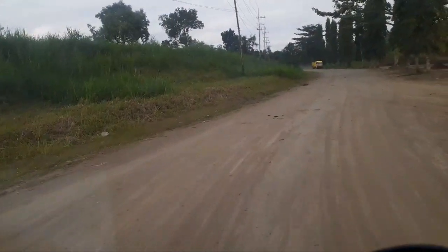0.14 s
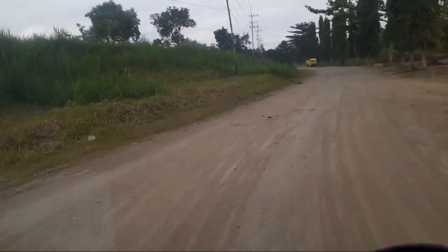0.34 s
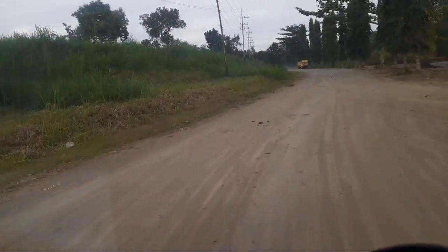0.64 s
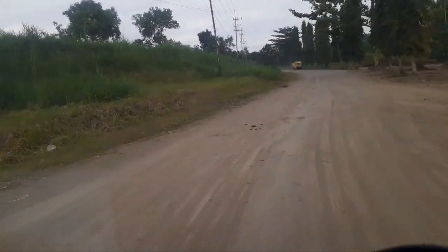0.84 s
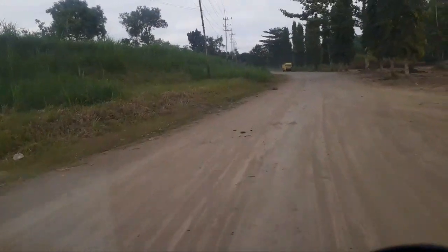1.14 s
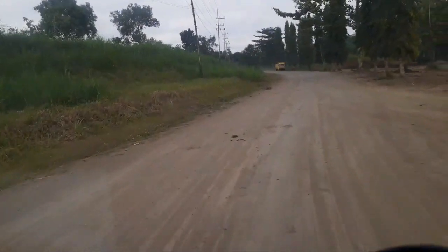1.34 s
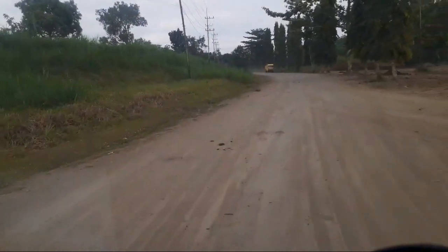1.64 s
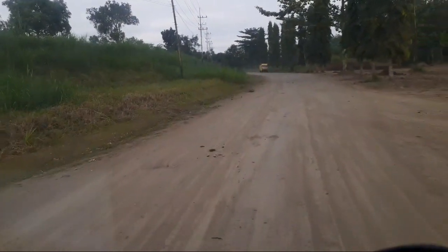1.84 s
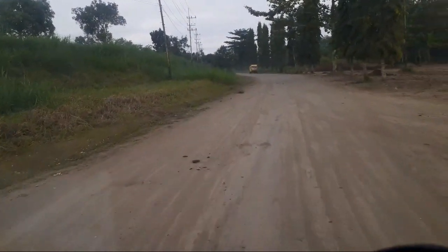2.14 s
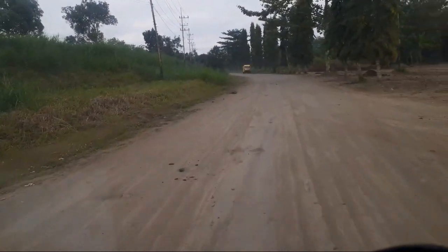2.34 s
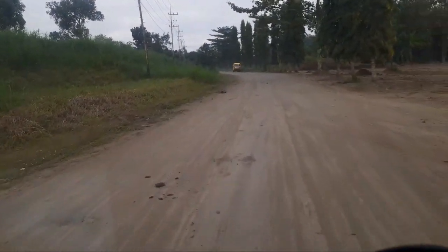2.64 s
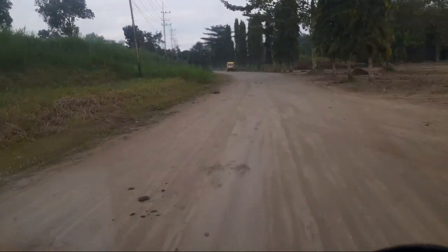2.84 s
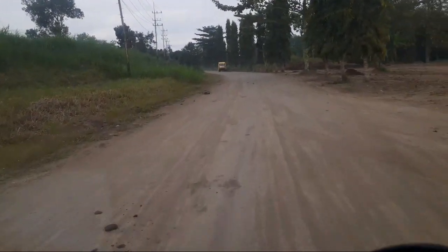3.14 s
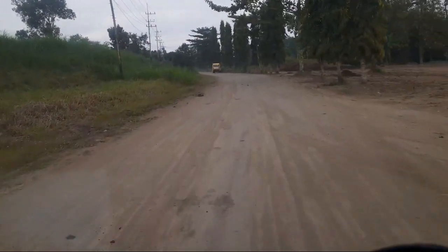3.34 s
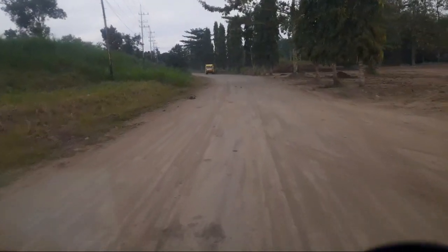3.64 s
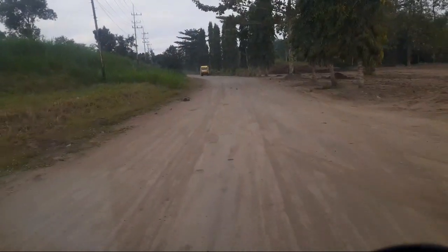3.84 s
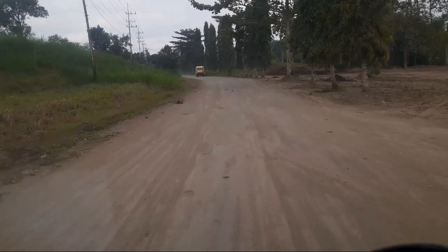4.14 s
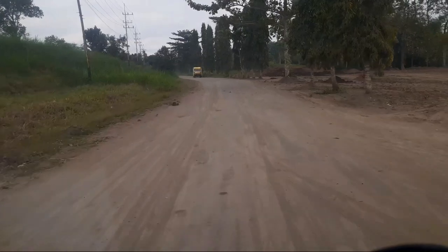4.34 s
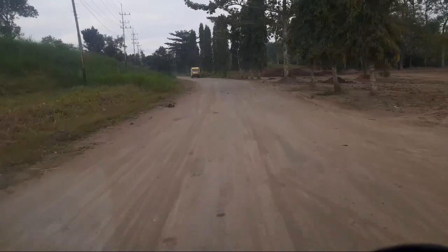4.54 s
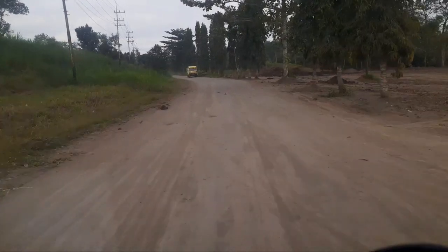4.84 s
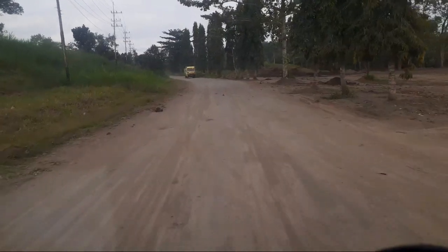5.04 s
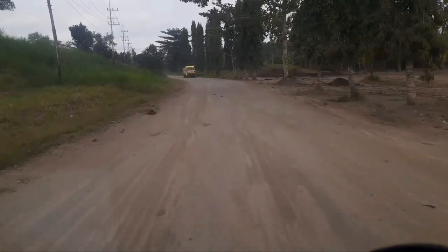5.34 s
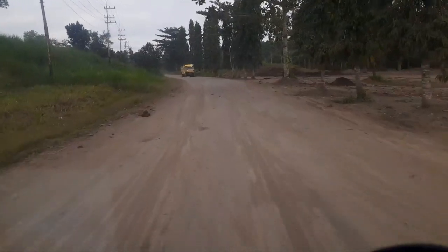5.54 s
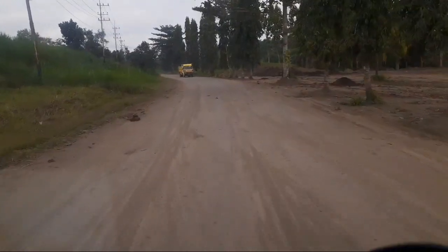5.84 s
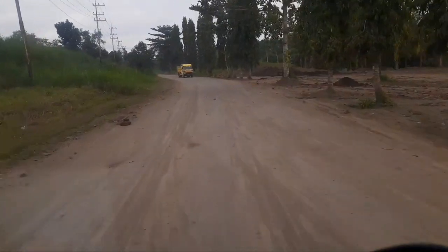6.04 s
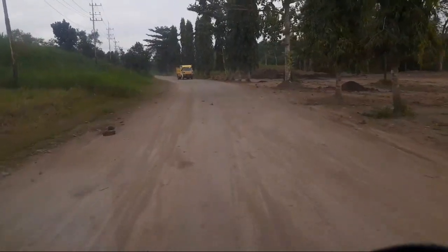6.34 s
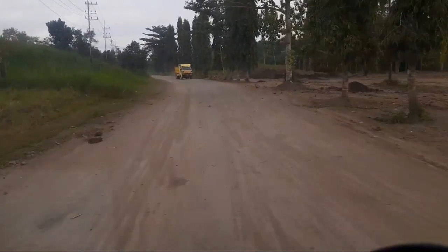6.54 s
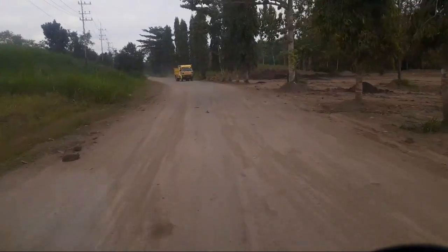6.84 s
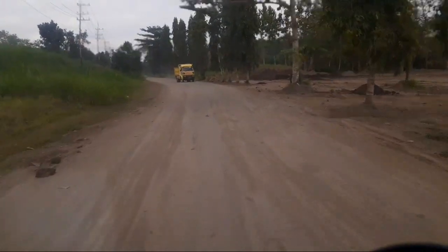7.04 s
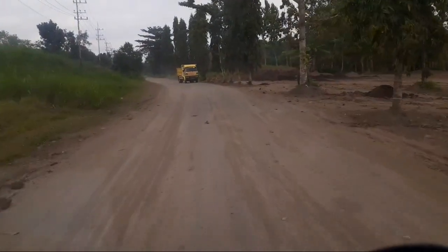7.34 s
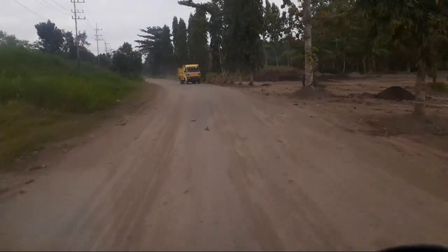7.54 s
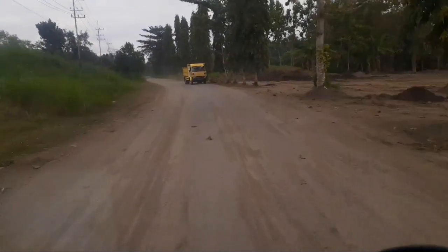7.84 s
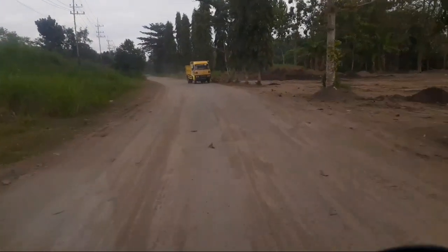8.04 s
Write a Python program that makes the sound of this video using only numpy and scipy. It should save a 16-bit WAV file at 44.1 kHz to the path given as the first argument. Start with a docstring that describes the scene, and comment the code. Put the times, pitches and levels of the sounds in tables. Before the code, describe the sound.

A four-cylinder diesel works hard, heard from the driver's cab: boomy low drone, metallic knocking and rattling panels. It winds up, falls away off the throttle with a faint sagging gear hum, knocks once dully as drive is taken up, dips slightly, then pulls again with growing growl. Packed-dirt tyre rumble runs beneath throughout, with airy hiss above; the microphone is inside.

```python
"""Inside the cab of a four-cylinder diesel dump truck on a dirt road.
The engine pulls, falls back for a gear change, takes up the drive with a clunk and builds again.
Firing pulses make a harmonic drone and ring the cab panels; blows of combustion ring the engine's steel.
Shaped noise gives injection clatter, hiss and road rumble; a gliding sine gives the hum of a gear mesh."""
import sys
import numpy as np
from scipy import signal
from scipy.fft import rfft, irfft
from scipy.io import wavfile

SR = 44100
rng = np.random.default_rng(int(sys.argv[2]) if len(sys.argv) > 2 else 0)


def to_wav(sig):
    """Store sig (one row per channel, or 1-D mono) as 16-bit WAV at the path in sys.argv[1].

    Samples outside -1..1 are clipped; the rate is SR.
    """
    pcm = np.clip(np.atleast_2d(sig), -1, 1) * 32767
    pcm = np.round(pcm).astype(np.int16)
    wavfile.write(sys.argv[1], SR, pcm.T)  # frames by channels


N = 360738
TIME, BINS = np.arange(N) / SR, np.fft.rfftfreq(N, 1 / SR)  # seconds, Hz
HALVES = np.array([[.5], [-.5]])  # shares a left-minus-right difference between the sides

# Engine speed before surging. Each row: time in seconds, firings per second.
ENGINE_SPEED = [(0.0, 60.23), (0.56, 61.37), (1.21, 68.54), (1.99, 75.4), (2.16, 66.33), (2.51, 54.61),
                (3.17, 34.39), (3.38, 41.77), (3.82, 44.34), (3.97, 38.75), (4.33, 44.18), (4.61, 46.14),
                (5.12, 50.48), (6.49, 65.01), (7.04, 69.72), (7.83, 73.27), (8.18, 72.16)]
# Winding and unwinding of the drive line in gear.
# Each row: time of a crest in seconds, spread in seconds, swing in firings per second.
DRIVELINE_SURGES = [(0.27, 0.58, 1.19), (7.35, 2.13, 0.92)]
SURGE_HZ = 1.66
# Accelerator pedal. Each row: time in seconds, share of full fuel from 0 to 1.
PEDAL = [(0, .8), (.7, 0.79), (1.94, 0.96), (2.17, 0.2), (3.1, 0.08), (3.25, 0.28), (3.58, 0.43),
         (3.95, 0.93), (8.18, 0.87)]

# Relative levels at cruising speed (firings per second), and their slopes over speed:
# moving parts; combustion noise and knock, both at full throttle.
CRUISE_HZ = 60
MOVING_DB, MOVING_DB_PER_OCTAVE = -47, 7.5
BURN_DB, BURN_DB_PER_OCTAVE = -40, 1.6
KNOCK_DB, KNOCK_DB_PER_OCTAVE = -33.5, -5
KNOCK_FUEL_POWER = 1.23  # the knock's amplitude grows with the fuel to this power

# Shaking of the cab at full throttle. Each row: firings per second, relative level in dB.
SHAKE_BY_SPEED = [(35, -22), (43, -19.5), (50, -17), (62, -17.5), (74, -14.5)]
# With no fuel the shaking drops (dB, at half PISTONS_HZ);
# above PISTONS_HZ (firings per second) the pistons alone keep it up.
UNFUELLED_DB, PISTONS_HZ = -7, 64

# Boom or cancellation in the cab's air. Each row: frequency in Hz, relative level in dB.
CAB_AIR = [(36, -20), (45, -3), (53, 1.7), (60, 0), (72, -6.5), (84, -14), (96, -9.5), (111, -4.5),
           (120, -9.5), (147, -11.5), (166, -22), (183, -6.5), (203, -0.5), (225, -3.5)]
# First three exhaust harmonics, in order: relative level in dB.
EXHAUST_HARMONICS_DB = [0.5, -0.5, -6]
# Engine orders that stand out. Each row: multiple of the firing rate, extra level in dB.
STRONG_ORDERS = [(2.5, 0.5), (3.25, 15.5), (3.5, 3.5), (4, 10.5), (4.5, 10), (5, 5.5), (5.5, 10), (6, 2),
                 (6.5, 7.5), (6.75, 9), (7.5, 6.5), (8, 1.5), (8.5, 7)]
# Cab panel resonances. Each row: frequency in Hz, width in Hz, relative level in dB,
# left minus right in dB, phase lead of the left side in radians.
CAB_MODES = [(122, 26, -6.5, 0.5, 0.5), (183.4, 8.5, 1.5, -3, -1.5), (209, 37, -2.5, 2, 0.65),
             (316.1, 22, 4.5, 1.5, 0.41), (346, 37.4, 1, 0.5, 0.5), (427, 11, -14.5, -7, 0.9),
             (542, 35.5, -2.5, 0, -1.35), (596, 12, 4.5, -6.5, -2), (821, 59, -2.5, 7, -3),
             (938, 27, -17.5, -16, 0.5), (1120, 44, -3, -3, -3)]
# Modes of the engine's steel. Each row: frequency in Hz, width in Hz, relative level in dB,
# left minus right in dB, phase lead of the left side in radians.
STEEL_MODES = [(1518, 55, 15, 6.2, 1.62), (1625, 44, 0, 2.5, 4.4), (1370, 60, -17, 2, 7.1)]

# Noise spectra of clatter, hiss and road. Each row: frequency in Hz, relative density in dB per Hz.
CLATTER_SPECTRUM = [(350, -14.5), (560, 9), (720, -2.5), (850, 2.5), (1300, -2.5), (1800, -6), (2100, -9),
                    (2500, -10), (3300, -18), (5000, -23.5), (7000, -29), (15000, -44)]
HISS_SPECTRUM = [(1500, -33), (4000, 0), (6000, -16), (7200, -7.5), (8400, 1.5), (10000, -0.5), (13000, -1),
                 (15500, -1.5)]
ROAD_SPECTRUM = [(15, -20), (30, -17), (55, 8.5), (85, -1), (130, 5), (200, 3), (260, 1), (400, -3.5),
                 (700, -18), (2000, -43.5)]
# Likeness of the two sides of the noises. Each row: frequency in Hz, correlation from -1 to 1.
SIDE_CORRELATION = [(100, 1), (250, 1), (400, 0.17), (600, -0.42), (1200, -0.25), (2500, -0.087),
                    (5000, -0.0072)]
# Balance of the noises. Each row: frequency in Hz, left minus right in dB.
SIDE_BALANCE = [(100, 2.5), (350, -1), (600, -7), (1000, 1), (1600, 2.5), (2400, -1), (5000, -1.5),
                (7200, -1), (10000, 1.6)]

# The gear mesh turns with the engine until the clutch opens, then slows with the rolling truck.
MESH_PER_FIRING, CLUTCH_S, MESH_END_S = 4.5, 2.0, 4.2  # teeth meeting per firing, seconds, seconds
MESH_SAG_HZ_PER_S = 34
# Passage of the gear hum through the floor. Each row: frequency in Hz, level in dB.
FLOOR_PATH = [(272, -21), (282, -24.5), (295, -39), (319, -27.5), (331, -15), (340, -20)]
# Drive line taking up its slack. Each row: frequency in Hz, level in dB, 60 dB decay in seconds.
CLUNK_MODES = [(132, -19, 0.44), (177, -16.5, 0.24), (310, -17, .06)]
CLUNK_S = 3.221
EDGE_HZ = 15600


def gain_of(db):
    """Logarithmic level: decibels become an amplitude ratio."""
    return 10 ** (np.asarray(db) / 20)


def evened(x):
    """Normalization of power: the rms value becomes one."""
    return x / np.sqrt(np.mean(x ** 2) + 1e-20)


def read(points, at=BINS):
    """Logarithmic interpolation: straight lines join the points over the log of the first column."""
    position, value = np.transpose(points)
    return np.interp(np.log(at + 1), np.log(position + 1), value)


def curve(rows):
    """Linear interpolation in time, at every sample."""
    return np.interp(TIME, *np.transpose(rows))


def wander(rate_hz):
    """Low-passed random process: slow fluctuation of rms one."""
    spectrum = rfft(rng.standard_normal(N))
    return evened(irfft(spectrum / (1 + (BINS / rate_hz) ** 4), N))


def ticks(turns):
    """Impulse train: one click at each whole turn."""
    count = np.floor(turns)
    return np.diff(count, prepend=count[0])


def bandpassed(x, low_hz, high_hz):
    """Second-order Butterworth band-pass filtering."""
    return signal.sosfilt(signal.butter(2, [low_hz, high_hz], "bandpass", fs=SR, output="sos"), x)


def noise(spectrum):
    """Partial coherence: shaped noise whose two sides correlate differently at each frequency."""
    left, other = rfft(rng.standard_normal((2, N)))
    same = np.clip(read(SIDE_CORRELATION), -1, 1)
    right = same * left + np.sqrt(1 - same ** 2) * other
    db = read(spectrum) + HALVES * read(SIDE_BALANCE)
    return evened(irfft(np.array([left, right]) * gain_of(db), N))


def ring(force, modes):
    """Modal superposition: a force rings damped modes, each with its own level and phase at each side."""
    response = np.zeros((2, len(BINS)), complex)
    for hz, width, db, balance_db, lead in modes:
        damping = 1j * BINS * width
        mode = damping / (hz ** 2 - BINS ** 2 + damping)
        response += gain_of(db + HALVES * balance_db) * np.exp(1j * HALVES * lead) * mode
    return evened(irfft(rfft(force) * response, N))


def engine_speed():
    """Torsional oscillation: the firing rate rocks slowly where the drive line surges."""
    surge = 0
    for crest_s, spread_s, swing in DRIVELINE_SURGES:
        since = TIME - crest_s
        surge = surge + swing * np.exp(-(since / spread_s) ** 2) * np.cos(2 * np.pi * SURGE_HZ * since)
    return curve(ENGINE_SPEED) + surge


def drone(firings, speed_hz, shake_db, waver_db=0.68, balance_db=1.4):
    """Harmonic excitation of an air cavity: exhaust harmonics boom or cancel as they glide."""
    boom = 0
    for k, harmonic_db in enumerate(EXHAUST_HARMONICS_DB, 1):
        db = harmonic_db + read(CAB_AIR, k * speed_hz) + waver_db * wander(12)
        boom = boom + gain_of(db) * np.sin(2 * np.pi * k * firings)
    return np.sqrt(2) * boom * gain_of(shake_db + balance_db * HALVES)


def block_force(firings, uneven_db, slope_db, scatter, thud_at, size=4096, count=88):
    """Fourier synthesis of a four-firing cycle: unequal cylinders add half and quarter orders."""
    index = np.arange(count)
    order = index / 4  # multiple of the firing rate
    db = uneven_db * (index % 2) + slope_db * np.log2(np.maximum(order / 6, 1))
    for multiple, extra_db in STRONG_ORDERS:
        db = db + extra_db * (index == round(4 * multiple))
    left_out = np.isin(index, [0, 1, 2, 4, 8, 12])  # includes the drone's three harmonics
    # high orders take many paths through the frame and lose their timing
    phase = scatter * (1 + index / 40) * rng.standard_normal(count) - 2 * np.pi * order * thud_at
    cycle = irfft(gain_of(db) * ~left_out * np.exp(1j * phase), size)
    return evened(np.interp(firings, np.arange(size) * 4 / size, cycle, period=4))


def cab(firings, speed_hz, shake_db, load_db, level_db=-2.5, bright_db=-1, throb_db=1.43, kick_db=-3):
    """Forced vibration of panels: the block rings them, chugs at low speed or load, and growls with load."""
    force = block_force(firings + .005 * wander(20), uneven_db=-6, slope_db=-2.5, scatter=1, thud_at=2.5)
    force = (force + .33 * wander(700)) * gain_of(1.1 * wander(12))
    soft = signal.sosfiltfilt(signal.butter(3, 460, fs=SR, output="sos"), force)
    slow = np.clip((62 - speed_hz) / 60, 0, .4)
    coasting = np.clip((-43 - load_db) / 8, 0, 1)
    chug = slow + coasting
    # two opposite cylinders kick harder than the others, one most of all
    since = firings - 2.9
    chug_db = 1.2 * chug * (np.cos(np.pi / 2 * since) + np.cos(np.pi * since))
    steady_db = throb_db * (np.cos(np.pi / 2 * (firings - 2.4)) + np.cos(np.pi * (firings - 2.3)))
    kicks = ticks(since / 4) + .6 * ticks(since / 4 + .5)
    kicks = evened(bandpassed(kicks, 170, 400))
    thud = soft * gain_of(chug_db + steady_db) + gain_of(kick_db) * chug * kicks
    thud = thud / np.sqrt(1 + .4 * chug ** 2)
    shake = gain_of(shake_db)
    growl = (force - soft) * evened(np.sqrt(shake * gain_of(load_db))) * gain_of(bright_db)
    panels = ring(thud * evened(shake) + growl, CAB_MODES)
    return gain_of(level_db) * np.sqrt(np.mean(shake ** 2)) * panels


def knock(firings, knock_db, load_db, level_db=2.5, turn_db=3, firing_db=-0.5):
    """Impact excitation: combustion and injector blows, two for each firing, ring the engine's steel."""
    angle = 2 * np.pi * (firings - .3)
    beat_db = firing_db * np.cos(angle) + turn_db * np.cos(angle / 2)
    # on little fuel one cylinder's knock stands out
    light = np.clip((-43 - load_db) / 7, 0, 1)
    light_beat_db = 6 * np.cos(np.pi / 2 * (firings - .85)) - 1.5
    beat_db = (1 - light) * beat_db + light * light_beat_db
    # each ignition comes a little early or late, which blurs the ringing into a band
    blows = evened(ticks(angle / np.pi + .04 * wander(90)) * gain_of(2 * wander(60)))
    rattle = .6 * (1 + .6 * np.cos(2 * angle)) * rng.standard_normal(N)
    force = bandpassed(gain_of(beat_db) * (blows + rattle), 1250, 1850)
    return gain_of(level_db + knock_db) * ring(force, STEEL_MODES)


def clatter(firings, load_db, fuel, coasting_db=-3, level_db=14.5, cycle_db=1, flicker_db=0.76):
    """Amplitude modulation: injection and valve noise swells once a cycle, softer as injectors rest."""
    beat_db = cycle_db * np.cos(np.pi / 2 * (firings - 3.6))
    db = level_db + load_db + coasting_db * (1 - fuel) + beat_db + flicker_db * wander(56)
    return gain_of(db) * noise(CLATTER_SPECTRUM)


def hiss(firings, load_db, level_db=-2, idle_db=-56, throb_db=0.7, coasting_throb_db=2.0, flicker_db=1.0):
    """Periodic modulation of noise: airy hiss throbs with cycle and firing, most plainly off throttle."""
    angle = np.pi / 2 * (firings - 3.3)
    throb = np.cos(angle) - 0.3 * np.sin(2 * angle) + 0.65 * np.cos(2 * np.pi * firings)
    loaded = gain_of(level_db + load_db + throb_db * throb)
    idle = gain_of(idle_db + coasting_throb_db * throb)
    return np.hypot(loaded, idle) * gain_of(flicker_db * wander(45)) * noise(HISS_SPECTRUM)


def gear(speed_hz, unloaded_db=-10):
    """Tooth-mesh excitation: a gliding hum weighted by its path through the floor, softer running free."""
    in_gear_hz = MESH_PER_FIRING * np.interp(np.minimum(TIME, CLUTCH_S), TIME, speed_hz)
    hz = in_gear_hz - MESH_SAG_HZ_PER_S * np.clip(TIME - CLUTCH_S, 0, MESH_END_S - CLUTCH_S)
    db = read(FLOOR_PATH, hz) + unloaded_db * np.clip((TIME - CLUTCH_S) / 0.18, 0, 1)
    fade = np.clip((MESH_END_S - TIME) / 0.11, 0, 1)
    level = np.sqrt(2) * fade * gain_of(db + 1.8 * wander(9))
    return level * np.sin(2 * np.pi * np.cumsum(hz + 2.5 * wander(10)) / SR)


def road(level_db=-29, bumps_db=2):
    """Random excitation: tyres rumble over packed dirt, with slow swells in level."""
    return gain_of(level_db + bumps_db * wander(3.5)) * noise(ROAD_SPECTRUM)


def clunk():
    """Free decay of modes: one short, dull knock as the clutch bites."""
    t = np.maximum(TIME - CLUNK_S, 0)
    modes = sum(gain_of(db - 60 * t / t60) * np.sin(2 * np.pi * hz * t) for hz, db, t60 in CLUNK_MODES)
    return (1 - np.exp(-t / .003)) * modes  # 3 ms onset


def scene():
    """Linear superposition: the crank times the engine sounds; throttle and speed set their levels."""
    speed_hz, fuel = engine_speed(), np.clip(curve(PEDAL), .01, 1)
    firings = np.cumsum(speed_hz) / SR
    octaves = np.log2(speed_hz / CRUISE_HZ)
    moving = gain_of(MOVING_DB + MOVING_DB_PER_OCTAVE * octaves)
    burning = fuel * gain_of(BURN_DB + BURN_DB_PER_OCTAVE * octaves)
    load_db = 20 * np.log10(np.hypot(moving, burning))
    slowness = np.clip(2 * (1 - speed_hz / PISTONS_HZ), 0, 1)
    shake_db = read(SHAKE_BY_SPEED, speed_hz) + UNFUELLED_DB * (1 - fuel) * slowness
    knock_db = KNOCK_DB + KNOCK_DB_PER_OCTAVE * octaves + 20 * np.log10(fuel ** KNOCK_FUEL_POWER)
    engine = drone(firings, speed_hz, shake_db) + cab(firings, speed_hz, shake_db, load_db)
    engine = engine + knock(firings, knock_db, load_db)
    engine = engine + clatter(firings, load_db, fuel) + hiss(firings, load_db)
    return engine + gear(speed_hz) + road() + clunk()


def record(dry):
    """Band limitation: a linear-phase low-pass filter removes the highest treble."""
    lowpass = signal.firwin(511, EDGE_HZ, window=("kaiser", 9), fs=SR)
    return signal.oaconvolve(dry, lowpass[None], "same")


dry = scene()
out = record(dry)
to_wav(out)
```